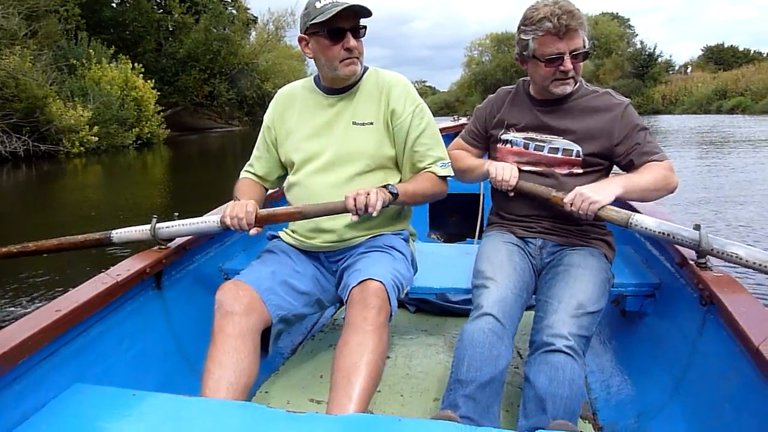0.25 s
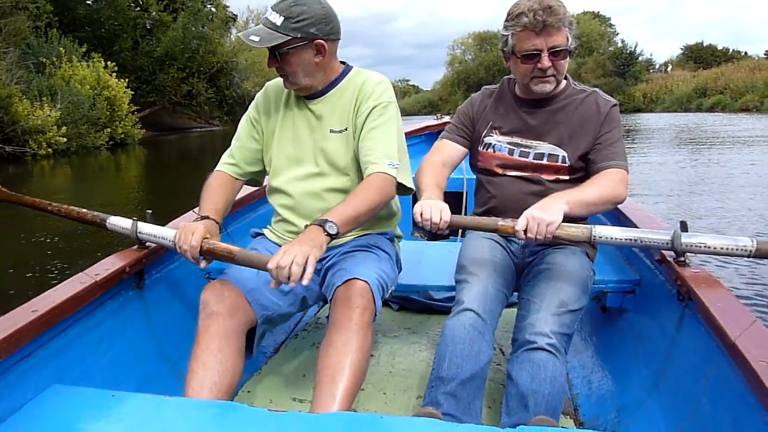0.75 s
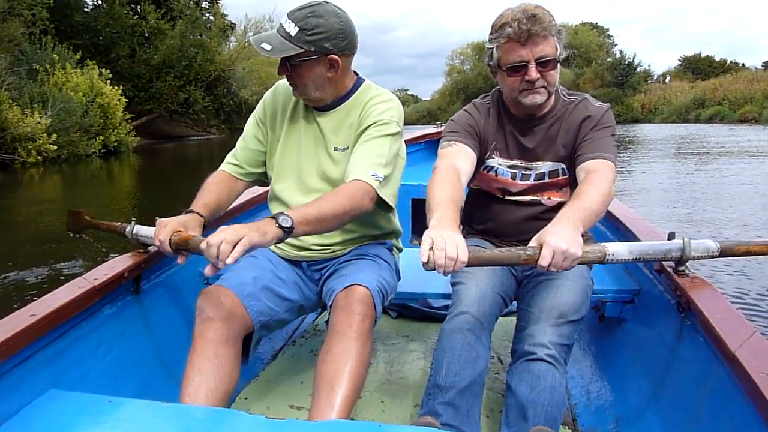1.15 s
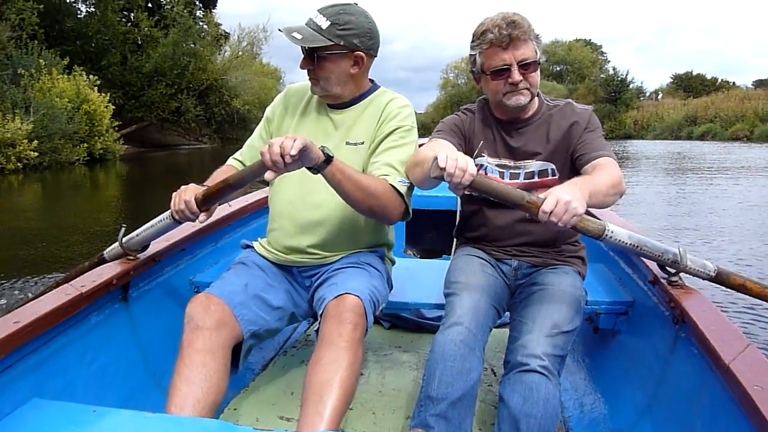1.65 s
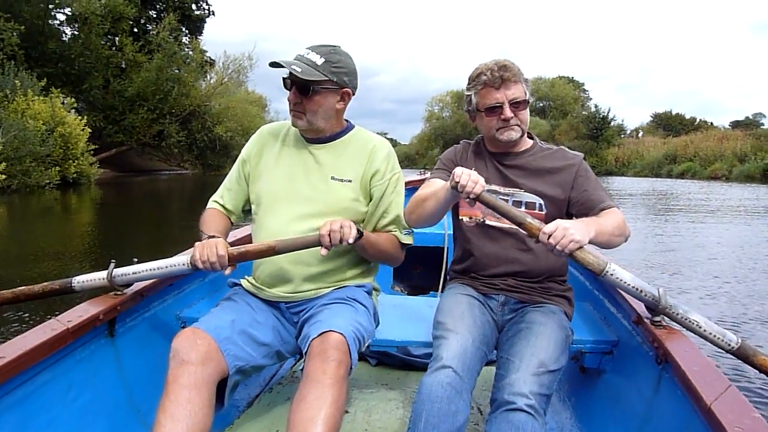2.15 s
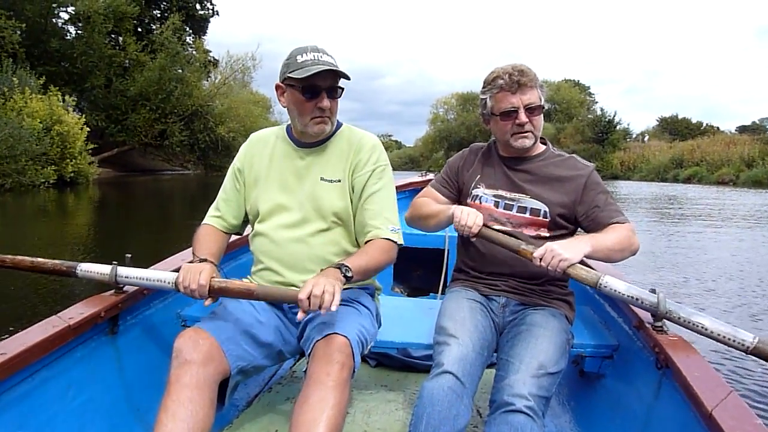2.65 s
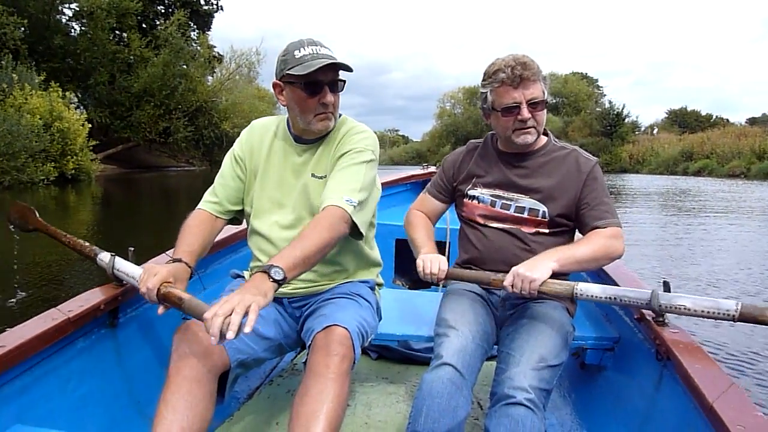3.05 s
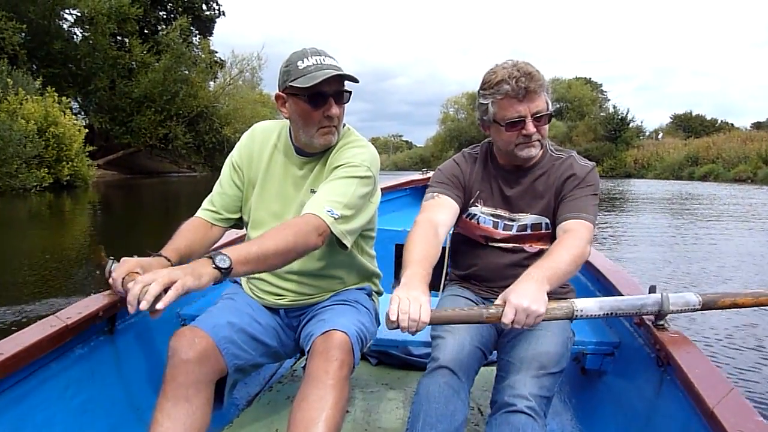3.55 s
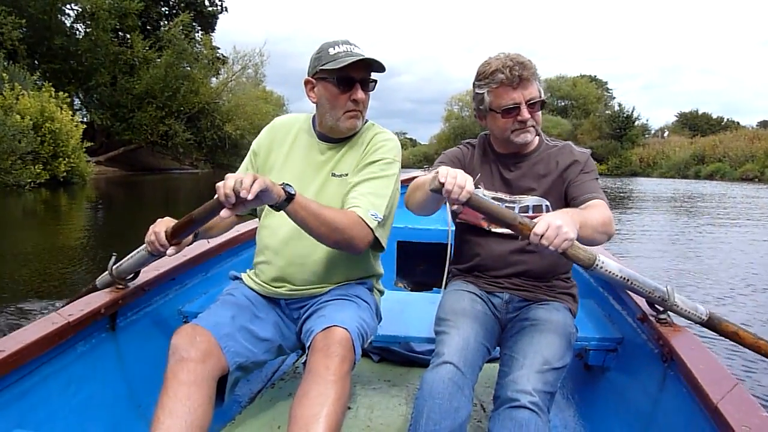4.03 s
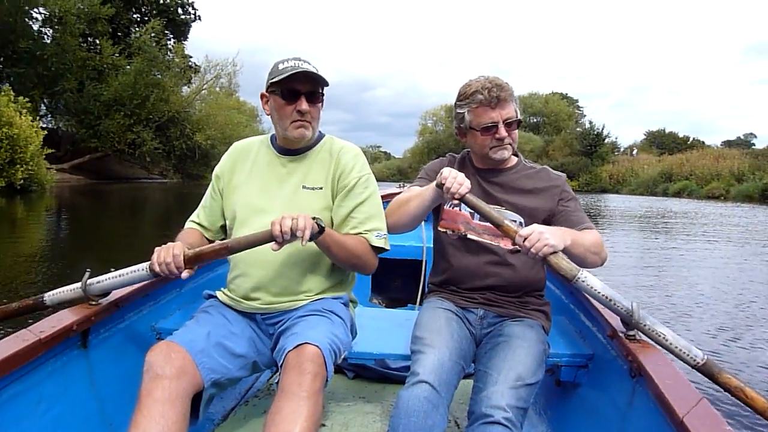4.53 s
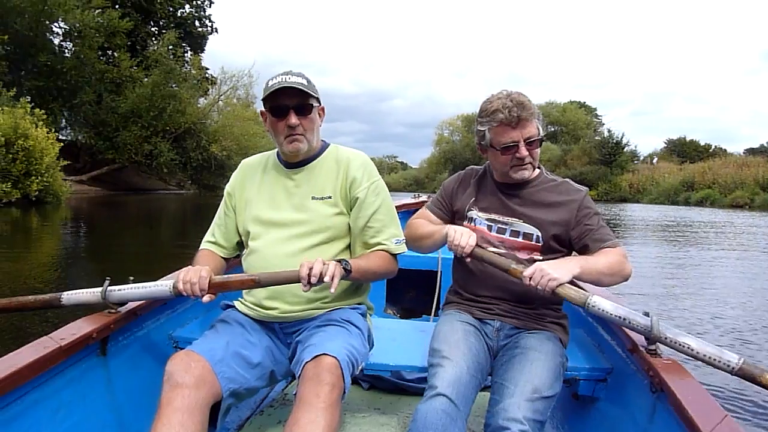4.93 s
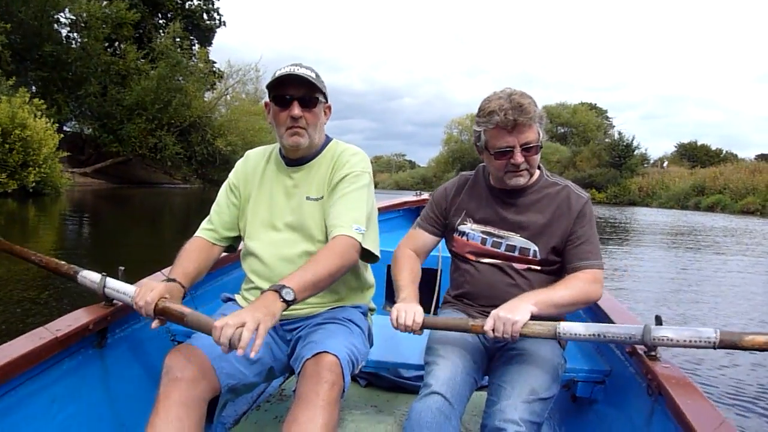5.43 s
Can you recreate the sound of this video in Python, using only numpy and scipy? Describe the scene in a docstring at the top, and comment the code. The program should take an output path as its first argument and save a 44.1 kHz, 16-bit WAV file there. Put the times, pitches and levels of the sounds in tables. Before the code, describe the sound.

Wooden oars clack and clunk in metal rowlocks on a small boat, with splashing, bubbling water and gusts of wind thumping the microphone.

```python
"""Oars knock in their metal rowlocks as two people row a small boat on a river; the hull answers each blow.
Each knock is a burst of dying noise with decaying modes of metal and planks; one rowlock pin squeaks.
Blades dip, splash and drip as ringing bubbles and coloured noise; slaps thud under the hull.
Gusts of low noise buffet both microphone ports, and the river rustles all around.
A small bird on the bank repeats a faint rising whistle, a gliding tone."""
import sys
import numpy as np
from scipy import signal
from scipy.fft import rfft, irfft, next_fast_len
from scipy.io import wavfile
from scipy.ndimage import map_coordinates

SR = 44100
rng = np.random.default_rng(int(sys.argv[2]) if len(sys.argv) > 2 else 0)


def transcribe(signal):
    """Save signal, clipped to [-1, 1], as a 16-bit WAV file at the path in sys.argv[1]."""
    frames = np.atleast_2d(signal).T
    limited = np.clip(frames, -1, 1)
    pcm = np.round(limited * 32767).astype(np.int16)
    wavfile.write(sys.argv[1], SR, pcm)


N = 250615  # length in samples


def amp(db):
    """Decibels to gain."""
    return 10 ** (np.asarray(db) / 20)


def unit(x):
    """Scale to rms 1."""
    return x / np.sqrt(np.mean(x ** 2) + 1e-20)


def along(points, hz):
    """Read a curve of (Hz, value) points on a log frequency axis."""
    f, v = np.transpose(points)
    return np.interp(np.log(hz + 1), np.log(f), v)


def wobble(rate):
    """A smooth random curve with `rate` knots a second."""
    knots = rng.standard_normal(int(N * rate / SR) + 4)
    return map_coordinates(knots, [np.arange(N) * rate / SR])


def decay(t, t60):
    """Gain that falls by 60 dB in t60 seconds."""
    return np.exp(-np.log(1000) * t / t60)


def balance(pan_db):
    """Gains of the left and right ports that differ by pan_db."""
    return amp([[pan_db / 2], [-pan_db / 2]])


def filtered(x, response):
    """Multiply the spectrum of x by a response of frequency."""
    n = x.shape[-1]
    m = next_fast_len(n + 8192)
    return irfft(rfft(x, m) * response(np.fft.rfftfreq(m, 1 / SR)), m)[..., :n]


def stereo(pair, spectrum, alike):
    """Mix two unrelated signals into a coloured left and right of rms 1, as alike as the curve says."""
    def mid_side(hz):
        turn = np.arccos(np.clip(along(alike, hz), -1, 1)) / 2
        return amp(along(spectrum, hz)) * [np.cos(turn), np.sin(turn)]

    mid, side = filtered(pair, mid_side)
    return unit(np.array([mid + side, mid - side]))


def add(track, s, sound):
    """Mix a sound into a track at s seconds."""
    start = max(round(s * SR), 0)
    part = track[..., start:start + sound.shape[-1]]
    part += sound[..., :part.shape[-1]]


def swells(events, rise_s, fall_s, rest_db):
    """Gain over time: each (start s, length s, dB) rises, holds and falls, above a resting level."""
    t = np.arange(0, N + 32, 32) / SR  # a coarse grid, interpolated below
    s, length, db = np.transpose(events)[:, :, None]
    away = np.maximum(s - t, 0) / rise_s + np.maximum(t - s - length, 0) / fall_s
    power = np.sum((amp(db) * decay(away, 1)) ** 2, axis=0) + amp(rest_db) ** 2
    return np.interp(np.arange(N) / SR, t, np.sqrt(power))


def echoed(x, t60, wet_db):
    """Add a diffuse tail of reflections, different at each port."""
    t = np.arange(int(SR * t60)) / SR
    tail = rng.standard_normal((2, len(t))) * decay(t, t60)
    tail /= np.linalg.norm(tail[0])
    return x + amp(wet_db) * signal.fftconvolve(x, tail, axes=1)[:, :N]


# How alike a sound is at the two microphone ports. Each row: frequency in Hz, likeness (1 is identical).
PORT_LIKENESS = [(400, 1), (1000, 0.63), (2200, 0.13), (4500, 0.21), (8000, 0.0039), (13000, -0.5)]


def ring(modes, t, spread_db):
    """Decaying modes at randomly varied strengths; the ports differ in phase as their likeness falls."""
    hz, db, t60 = np.transpose(modes)[:, :, None]
    size = amp(db + spread_db * rng.standard_normal(hz.shape))
    apart = np.arccos(np.clip(along(PORT_LIKENESS, hz), -1, 1)) / 2 * rng.choice([-1, 1], hz.shape)
    phase = 2 * np.pi * (hz * t + rng.random(hz.shape))
    fade = size / np.linalg.norm(size) * decay(t, t60)
    return np.sqrt(2) * np.array([(fade * np.sin(phase + side * apart)).sum(0) for side in (1, -1)])


def bubble(t, hz, t60, rise):
    """An air pocket rings and climbs in pitch as it nears the surface."""
    fade = decay(t, t60) * (1 - np.exp(-t * hz / 1.5))
    return fade * np.sin(2 * np.pi * hz * t * (1 + rise * t / t60 / 2))


def bubbles(rate, centre_hz, octaves, cycles, spread_db):
    """A cloud of bubbles, `rate` a second, of random pitch and size, in two mixtures."""
    t = np.arange(int(SR * min(1.5 * cycles / centre_hz, .03))) / SR
    when, pitch, life, size, angle = rng.random((int(rate * N / SR), 5)).T[:, :, None]
    hz = centre_hz * 2 ** (octaves * (2 * pitch - 1))
    loud = amp(-spread_db * np.log(np.maximum(size, .03)))
    grains = loud * bubble(t, hz, cycles * (.5 + life) / np.sqrt(hz * centre_hz), rise=0.12)
    at = ((when * N).astype(int) + np.arange(len(t))).ravel()
    shares = np.cos(2 * np.pi * angle), np.sin(2 * np.pi * angle)
    return unit(np.array([np.bincount(at, (grains * share).ravel(), N)[:N] for share in shares]))


# An oar strikes or shifts in its rowlock, in the boat with the microphone; the sound at 5.13 s is the knock
# of a plop. Each row: start in seconds, clack level in dB, hull level in dB before a 5 dB lift,
# treble tilt in dB per octave, contact resonance in Hz, strongest hull frequency in Hz, left over right in dB.
BOAT_KNOCKS = [(0.416, -18, -21, -1, 860, 168, 0), (0.641, -36.5, -39, -2, 1880, 220, -2.5),
               (0.998, -34.5, -26.5, -5, 920, 175, 1.5), (1.039, -16, -25.5, 2, 3480, 210, -1.5),
               (1.101, -18.5, -28, 1.5, 2900, 222, 2.5), (1.735, -35.5, -39, -1, 1060, 300, -1),
               (2.397, -47, -28.5, -4, 880, 297, 12), (2.555, -40, -54, 10, 4100, 220, 8),
               (2.5733, -20, -27.5, -2, 960, 222, 2), (2.82, -30.5, -34.5, -2.5, 1570, 428, -3),
               (2.896, -34.5, -23.5, 4, 1400, 390, -2), (2.932, -29.5, -42, 0, 1140, 432, -6),
               (3.2128, -28.5, -25, -2, 3930, 300, -1), (3.224, -21, -24, 1, 3600, 218, 0),
               (3.381, -34.5, -47, -3.5, 1590, 220, 2), (3.52, -30, -32, -10, 845, 428, -2),
               (3.5493, -18.5, -25, 2.5, 2500, 434, 1.5), (3.851, -25.5, -19.5, -4.5, 740, 244, 0),
               (4.063, -36.5, -44, 8, 2580, 220, -1), (4.114, -34.5, -41, 5.5, 1710, 220, 2),
               (4.241, -30, -36, 2.5, 2200, 220, 4.5), (4.289, -32, -53, -3.5, 1110, 293, 4),
               (5.13, -30.5, -29.5, -1, 2400, 300, -1), (5.173, -30, -29, 6, 3020, 300, -1),
               (5.179, -25, -26, -3.5, 1410, 300, -0.5), (5.192, -21, -21, -3.5, 850, 308, 0),
               (5.201, -21, -16.5, -2, 1700, 306, 0.5), (5.2512, -27.5, -29.5, -2.5, 3250, 122, -4),
               (5.497, -38.5, -30.5, -6, 586, 219, 1), (5.608, -32, -38, -1.5, 980, 300, -2)]
# Wood on metal. Each row: frequency in Hz, relative level in dB.
CLACK_SPECTRUM = [(250, -42), (550, -2.5), (830, 0.5), (1300, -1), (1900, -1.5), (2900, -3), (4200, -9),
                  (7000, -18), (11000, -26), (16000, -45)]
# The clack dying away. Each row: frequency in Hz, time in seconds to fall 60 dB.
CLACK_T60 = [(500, 0.14), (1500, 0.075), (4000, 0.047), (12000, 0.078)]
# Modes of rowlock and shaft. Each row: frequency in Hz, relative strength in dB, time in seconds to fall 60 dB.
LOCK_MODES = [(842, 19, 0.16), (1025, 18, 0.13), (1880, 22, 0.042), (2362, 0.5, 0.024), (2620, 4, .1),
              (2970, -22, 0.031), (3590, -23, 0.019), (4100, 9, 0.2), (4630, 4, 0.11), (5640, -12, 0.097),
              (8950, -31, .06), (10770, 6, 0.13)]
# Modes of the planks. Each row: frequency in Hz, relative strength in dB, time in seconds to fall 60 dB.
PLANK_MODES = [(121.7, -8, 0.2), (157.4, -6, 0.17), (223.7, -3, 0.2), (307.3, -8, 0.26), (336, 3.5, 0.041),
               (426.8, -1.5, 0.11), (465.5, -2, 0.091)]
# Thin, high metallic pings close to some of the oar knocks. Each row: start in seconds, frequency in Hz,
# level in dB, time in seconds to fall 60 dB.
METAL_PINGS = [(0.418, 15070, -35, 0.11), (1.102, 13200, -47, 0.22), (3.536, 4950, -41, 0.15)]
# Only hard, bright blows ring the metal: its level under a full blow, then the clack (dB)
# and the tilt (dB per octave) of a full blow.
METAL_DB, FULL_BLOW_DB, FULL_TILT_DB = -20.5, -19, 3.5
METAL_PER_DB, METAL_PER_TILT = 1.2, 4.4  # dB lost per dB softer, and per dB per octave duller


def rowlocks():
    """Each knock: a hard contact, a dense clack, a brief metal ring and the boom of the hull."""
    out, t = np.zeros((2, N)), np.arange(SR // 4) / SR
    grid = np.geomspace(100, 16000, 80)
    clack_likeness = [(700, 1.0), (1400, 0.93), (2800, 0.58), (6000, 0.3), (13000, .05)]
    for s, db, hull_db, tilt_db, contact_hz, hull_hz, pan_db in BOAT_KNOCKS:
        # noise whose bands die away at their own rates
        hz, frames, bands = signal.stft(rng.standard_normal((2, len(t))), SR, nperseg=128)
        fade = amp(-60 * frames / along(CLACK_T60, hz)[:, None])
        dying = signal.istft(bands * fade, SR, nperseg=128)[1][:, :len(t)]
        contact = 1 + 1.13 * np.exp(-t / 0.0024)
        # the spot where the shaft meets the lock favours one band
        spot_db = 7 * np.exp(-(np.log2(grid / contact_hz) / 0.17) ** 2)
        colour_db = along(CLACK_SPECTRUM, grid) + tilt_db * np.log2(grid / 2000) + spot_db
        clack = stereo(dying * contact, np.transpose([grid, colour_db]), clack_likeness)
        # level set over the first 10 ms
        clack *= (1 - np.exp(-t / 0.001)) / np.std(clack[:, :SR // 100])

        metal = ring(LOCK_MODES, t, spread_db=2.5) * (1 - np.exp(-t / 0.00061))
        softer_db = max(FULL_BLOW_DB - db, 0)
        duller_db = max(FULL_TILT_DB - tilt_db, 0)
        metal_db = METAL_DB - METAL_PER_DB * softer_db - METAL_PER_TILT * duller_db

        # the direction of the push favours one mode of the hull
        planks = [(f, level + 6 * np.exp(-(np.log2(f / hull_hz) / 0.2) ** 2), t60)
                  for f, level, t60 in PLANK_MODES]
        boom = ring(planks, t, spread_db=2.0) * (1 - np.exp(-t / 0.002))
        knock = amp(db) * clack + amp(metal_db) * metal + amp(hull_db + 5) * boom
        add(out, s, knock * balance(pan_db))
    for s, hz, db, t60 in METAL_PINGS:
        ping = ring([(hz, 0, t60)], t, spread_db=0) * (1 - np.exp(-t / 0.0011))
        add(out, s, amp(db) * ping)
    return out


def squeak(s=2.172, length=0.032, start_hz=2100, end_hz=2020, db=-27):
    """A dry rowlock pin gives one short, slightly falling peep."""
    out, u = np.zeros(N), np.linspace(0, 1, int(length * SR))
    phase = 2 * np.pi * np.cumsum(start_hz + (end_hz - start_hz) * u) / SR
    swell = np.sqrt(np.abs(np.sin(np.pi * u)))
    add(out, s, amp(db) * swell * np.sin(phase))
    return out


# A blade beside the boat works through the water or sheds drips. Each row: start in seconds,
# length in seconds, wash level in dB, spray level in dB.
BLADE_STROKES = [(0.162, 0.28, -36.5, -43), (1.248, 0.19, -62, -50), (1.449, 0.23, -46.5, -49.5),
                 (2.09, 0.18, -38, -48.5), (2.827, 0.28, -43, -48.5), (3.683, .25, -48, -48.5),
                 (4.552, 0.35, -46, -51), (5.137, .2, -42, -43.5)]
# A wavelet slaps the planks and breaks. Each row: start in seconds, hull thud in dB, splash in dB.
WAVELET_SLAPS = [(0.02, -39, -40), (0.085, -28.5, -39.5), (0.27, -37, -33.5), (0.332, -26, -31.5),
                 (0.55, -43.5, -41), (0.848, -30, -38.5), (1.129, -29, -38), (1.385, -33, -50),
                 (1.455, -30.5, -42), (1.567, -40, -29.5), (1.606, -28, -50), (1.785, -28.5, -33),
                 (2.077, -28, -38), (2.3, -30.5, -46), (2.62, -42, -41.5), (2.893, -28, -31.5),
                 (3.06, -37.5, -47), (3.26, -30.5, -46.5), (3.542, -29.5, -42.5), (3.692, -28.5, -45.5),
                 (3.781, -31, -66), (3.907, -33.5, -32.5), (4.005, -34.5, -51), (4.088, -32, -53),
                 (4.253, -32, -43.5), (4.49, -47, -43), (4.547, -39, -42), (4.615, -35.5, -50),
                 (4.679, -35, -48), (4.88, -47, -37.5), (4.993, -36.5, -40), (5.263, -27.5, -36.5),
                 (5.51, -32.5, -70), (5.617, -32.5, -46)]
# Stirred water. Each row: frequency in Hz, relative level in dB.
WASH_SPECTRUM = [(200, -47), (500, -3.5), (900, 0.5), (1400, -1.5), (2500, -4), (4000, -7), (7000, -18),
                 (16000, -19)]
# Thrown droplets. Each row: frequency in Hz, relative level in dB.
SPRAY_SPECTRUM = [(1000, -37), (2500, -3.5), (5000, 3.5), (8000, -1.5), (12000, -2), (16000, -4.5)]
# rises and falls are times for 60 dB; the spray lands late
STROKE_RISE_S, WASH_FALL_S, SPRAY_FALL_S, SPRAY_LAG_S = 0.67, 0.35, 0.32, 0.02
SLAP_RISE_S, SLAP_HOLD_S, THUD_FALL_S, SPLASH_FALL_S = 0.14, 0.0042, 0.35, 0.19
CALM_THUD_DB, CALM_WASH_DB, CALM_SPRAY_DB = -48, -53, -54  # water along the gliding boat


def blades():
    """Stirred water is a crowd of bubbles on soft noise; thrown spray is clumps of tiny droplets in a fizz."""
    washes = [(s, length, db) for s, length, db, _ in BLADE_STROKES]
    stirred = swells(washes, STROKE_RISE_S, WASH_FALL_S, CALM_WASH_DB)
    splashes = [(s, SLAP_HOLD_S, db) for s, _, db in WAVELET_SLAPS]
    broken = swells(splashes, SLAP_RISE_S, SPLASH_FALL_S, -np.inf)
    sprays = [(s + SPRAY_LAG_S, length, db) for s, length, _, db in BLADE_STROKES]
    thrown = swells(sprays, STROKE_RISE_S, SPRAY_FALL_S, CALM_SPRAY_DB)

    gurgle = bubbles(rate=1500, centre_hz=1300, octaves=1.5, cycles=18, spread_db=4.5)
    churn = rng.standard_normal((2, N)) * amp(3.5 * wobble(110))
    wash = stereo(gurgle + amp(3) * unit(churn), WASH_SPECTRUM, PORT_LIKENESS)

    droplets = bubbles(rate=1800, centre_hz=6500, octaves=1.1, cycles=5, spread_db=6)
    fizz = droplets * amp(3 * wobble(45)) + amp(-6) * rng.standard_normal((2, N))
    spray = stereo(echoed(fizz, t60=0.031, wet_db=-3.5), SPRAY_SPECTRUM, PORT_LIKENESS)
    return np.hypot(stirred, broken) * wash + thrown * spray


# Louder bubbles around the blades. Each row: start in seconds, frequency in Hz, level in dB before
# a 3.5 dB cut, climb in pitch over its life as a fraction.
LOUD_BUBBLES = [(0.165, 1084, -15, 0.25), (0.466, 2340, -16, 0.047), (0.483, 1870, -23, 0.17),
                (0.6, 688, -25.5, 0.08), (0.784, 1300, -23.5, .06), (1.486, 940, -22.5, 0.89),
                (1.552, 2960, -20.5, 0.084), (1.558, 1120, -13.5, .1), (1.586, 847, -14, 1),
                (2.03, 890, -28, 0.66), (2.259, 2660, -18.5, 0.12), (2.754, 790, -26.5, 0.59),
                (2.956, 1880, -20, .03), (3.903, 2930, -18, 0.34), (3.918, 2190, -18, 0.34),
                (4.65, 3280, -16.5, 0), (4.870, 804, -18, 0.78), (4.889, 1055, -23.5, 0.034),
                (4.909, 1110, -19, 0.85), (4.993, 1660, -22.5, 0.058), (5.132, 2520, -11.5, .2),
                (5.26, 1150, -15, .3), (5.272, 904, -21.5, .9)]
# Drops of spray hit the water and the boat. Each row: start in seconds, peak in dB before a 1 dB lift,
# left over right in dB before the water's shared balance.
SPRAY_DROPS = [(0.255, -26, 0.0), (0.321, -22.5, -1), (1.3249, -28, 6), (1.342, -28.5, 19),
               (1.4353, -33, 13), (1.668, -24, -3.0), (2.0516, -30.5, 15), (3.058, -22.5, -2),
               (3.7468, -30, 1), (4.65, -25.5, 0), (4.9613, -28, -6), (5.256, -34, -12.5), (5.313, -28, -3),
               (5.3166, -23.5, -11)]
PLOP_CYCLES = 37  # cycles in which a bubble falls 60 dB
# fainter bubbles scattered through each stroke: spread either way in octaves, climb as a fraction,
# mean dB over the stroke's wash before the same 3.5 dB cut
GLUGS_PER_S, GLUG_HZ, GLUG_OCTAVES, GLUG_RISE, GLUG_DB = 60, 1300, 0.91, 0.48, 5.5


def plops():
    """Loud and faint ringing bubbles around the blades and sharp drops, blurred by the sides of the boat."""
    out, t = np.zeros((2, N)), np.arange(SR // 5) / SR
    glugs = []
    for s, length, db, _ in BLADE_STROKES:
        for when, pitch, strength in rng.random((int(GLUGS_PER_S * length), 3)):
            hz = GLUG_HZ * 2 ** (GLUG_OCTAVES * (2 * pitch - 1))
            glugs.append((s + when * length, hz, db + GLUG_DB + 8 * (strength - .5), GLUG_RISE))
    for s, hz, db, rise in LOUD_BUBBLES + glugs:
        plop = bubble(t, hz, PLOP_CYCLES / hz, rise)
        add(out, s, amp(db - 3.5) * plop * balance(rng.normal(0, 4)))
    for s, db, pan_db in SPRAY_DROPS:
        burst = rng.standard_normal((2, len(t))) * amp(-60 * t / 0.011)
        tick = stereo(burst, SPRAY_SPECTRUM, PORT_LIKENESS)
        add(out, s, amp(db + 1.0) * tick / np.abs(tick).max() * balance(pan_db))
    return echoed(out, t60=0.079, wet_db=-7)


# The slapped planks. Each row: frequency in Hz, relative level in dB.
HULL_SPECTRUM = [(60, -8), (110, -0.5), (170, 3.5), (225, 3.5), (305, -2.5), (365, -3), (435, -2),
                 (540, -10), (800, -19), (1600, -48.5)]


def hull():
    """Water shoves the planks in uneven slaps, heard from the middle of the boat."""
    thuds = [(s, SLAP_HOLD_S, db) for s, db, _ in WAVELET_SLAPS]
    shove = swells(thuds, SLAP_RISE_S, THUD_FALL_S, CALM_THUD_DB)
    uneven = rng.standard_normal((2, N)) * amp(2 * wobble(45))
    return shove * stereo(uneven, HULL_SPECTRUM, [(100, 1.0), (400, 0.96)])


# A gust buffets the microphone ports. Each row: start in seconds, length in seconds, level in dB.
WIND_GUSTS = [(0.0, 0.14, -30), (0.33, 0.18, -35), (0.83, 0.28, -28.5), (1.24, 0.35, -45),
              (2.07, 0.14, -35.5), (2.34, 0.42, -27.5), (2.86, 0.45, -31.5), (3.45, 0.2, -36.5),
              (4.26, 0.45, -34), (4.85, 0.77, -47)]
# The rumble of a gust. Each row: frequency in Hz, relative level in dB.
BUFFET_SPECTRUM = [(20, -37), (40, -10), (65, 2), (100, 3.5), (170, 2), (250, -6.5), (350, -11.5),
                   (500, -27.5), (1000, -34), (3000, -82)]
# Single eddies burst on the ports. Each row: centre in seconds, frequency in Hz, left in dB, right in dB.
PORT_EDDIES = [(0.082, 130, -16, -31), (0.157, 121, -14, -17), (0.813, 110, -20.5, -36),
               (0.895, 114, -31, -18), (1.087, 100, -29, -17), (1.918, 138, -15.5, -17.5),
               (2.087, 129, -17, -16.5), (2.124, 109, -20, -35), (2.225, 131, -14.5, -18),
               (2.299, 110, -15, -13.5), (2.360, 172, -10.5, -12.5), (2.399, 201, -10.5, -11.5),
               (2.511, 172, -21, -10), (2.604, 154, -19.5, -12), (2.729, 131, -17.5, -18),
               (3.272, 140, -30, -14), (3.447, 130, -14.5, -17), (3.625, 99, -20.5, -24),
               (4.706, 158, -19.5, -21)]
# The turbulence inside an eddy. Each row: frequency in Hz, relative level in dB.
PUFF_SPECTRUM = [(60, -16), (130, -2), (220, 2), (340, -4.5), (500, -16), (1000, -48), (3000, -74)]
GUST_RISE_S, GUST_FALL_S, LULL_DB = 0.46, 0.47, -51  # times for 60 dB; the wind between gusts
PUFF_DB, PUFF_WIDTH_S = -11, 0.015  # level relative to the thump; half its length


def wind():
    """Gusts rumble differently at each port; single eddies thump inside a short puff of turbulence."""
    strength = swells(WIND_GUSTS, GUST_RISE_S, GUST_FALL_S, LULL_DB)
    lumps = amp(2.5 * np.array([wobble(30), wobble(36)]))
    rumble = stereo(lumps * rng.standard_normal((2, N)), BUFFET_SPECTRUM, [(60, 0.07), (250, 0.18)])

    thumps, t = np.zeros((2, N)), np.arange(SR // 10) / SR - 1 / 20  # time from the eddy's centre
    for s, hz, left_db, right_db in PORT_EDDIES:
        thump = np.exp(-(t * hz) ** 2 * 1.6) * np.cos(2 * np.pi * (hz * t + rng.random((2, 1))))
        turbulence = stereo(rng.standard_normal((2, len(t))), PUFF_SPECTRUM, [(60, 0)])
        puff = np.exp(-(t / PUFF_WIDTH_S) ** 2) * turbulence
        add(thumps, s + t[0], amp([[left_db], [right_db]]) * (thump + amp(PUFF_DB) * puff))

    breeze_spectrum = [(20, -11), (60, 15), (150, -8), (500, -27)]
    breeze = amp(-50) * stereo(rng.standard_normal((2, N)), breeze_spectrum, [(60, 0)])
    return strength * rumble + thumps + breeze


# The whistles of the bird on the bank. Each row: start in seconds, length in seconds, start frequency in Hz,
# frequency at the break upward in Hz, end frequency in Hz, level in dB around which it quavers.
BIRD_WHISTLES = [(0.15, .155, 3550, 4400, 5350, -47), (1.29, .155, 3300, 4600, 5550, -49),
                 (2.41, .15, 3950, 4850, 5150, -55), (3.605, .155, 3350, 4050, 5000, -51)]


def bird():
    """A slightly quavering whistle that swells, climbs, breaks upward and levels off, blurred by the trees."""
    out = np.zeros((2, N))
    for s, length, start_hz, break_hz, end_hz, db in BIRD_WHISTLES:
        u = np.linspace(0, 1, int(length * SR))
        quaver = wobble(66)[:len(u)]
        glide = np.interp(u, [0, .6, .72, 1], [start_hz, break_hz, end_hz * .98, end_hz])
        phase = 2 * np.pi * np.cumsum(glide * (1 + .008 * quaver)) / SR
        swell = np.sqrt(np.abs(np.sin(np.pi * u)))
        add(out, s, amp(db + 2 * quaver) * swell * np.sin(phase))
    return echoed(out, t60=.18, wet_db=-5)


# Ripples and leaves all around. Each row: frequency in Hz, relative level in dB.
RIVER_SPECTRUM = [(300, -1), (700, 0.5), (1500, -4), (3000, -5), (6000, -9.5), (10000, -11), (16000, -19)]


def river():
    """The even rustle of open water and bankside leaves: coloured noise that drifts slightly in level."""
    rustle = stereo(rng.standard_normal((2, N)), RIVER_SPECTRUM, PORT_LIKENESS)
    return amp(-53.0 + 0.79 * wobble(2.25)) * rustle


def scene():
    """The boat, the river, the wind and the bank; the water leans 1 dB to the left."""
    oars = rowlocks() + squeak()
    planks = hull()
    water = (blades() + plops() + river()) * balance(1)
    return oars + planks + water + wind() + bird()


def record(dry):
    """The microphone side keeps nothing from 16 kHz upward."""
    return filtered(dry, lambda hz: hz < 16000)


dry = scene()
out = record(dry)
transcribe(out)
```